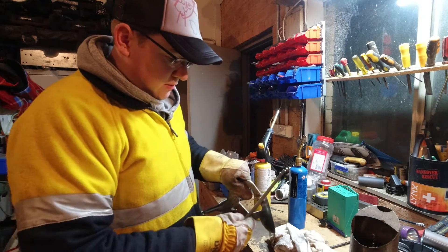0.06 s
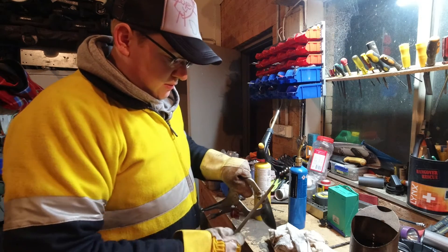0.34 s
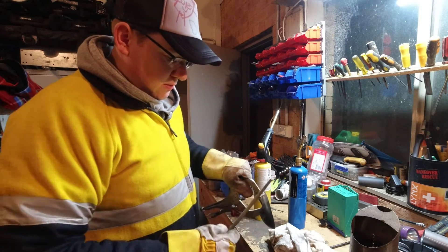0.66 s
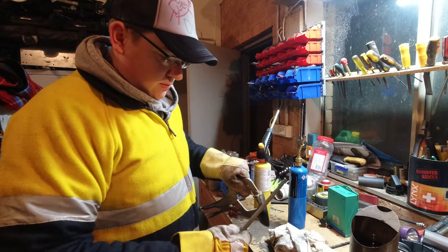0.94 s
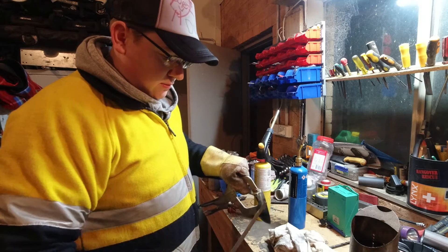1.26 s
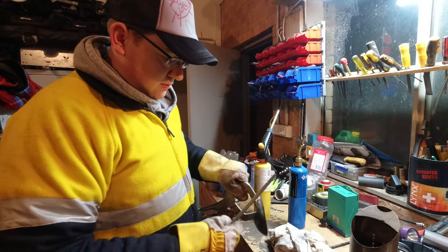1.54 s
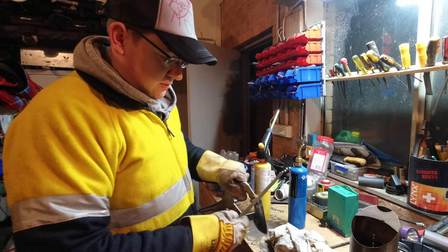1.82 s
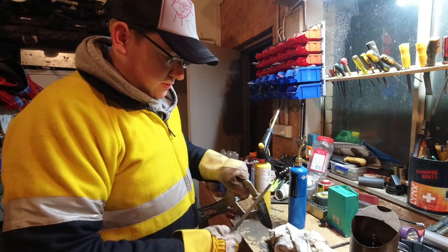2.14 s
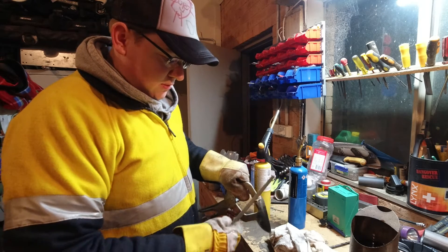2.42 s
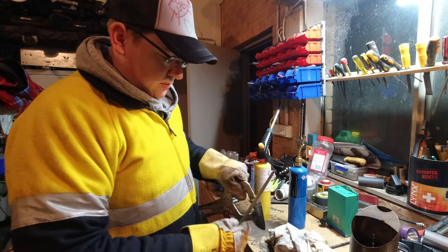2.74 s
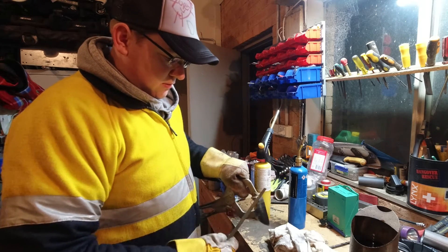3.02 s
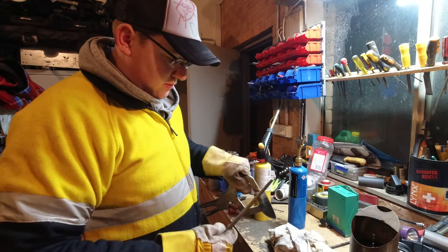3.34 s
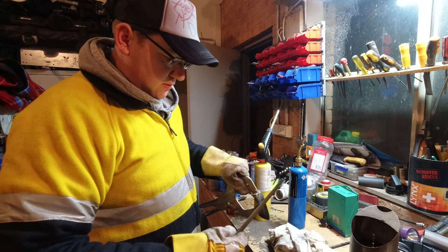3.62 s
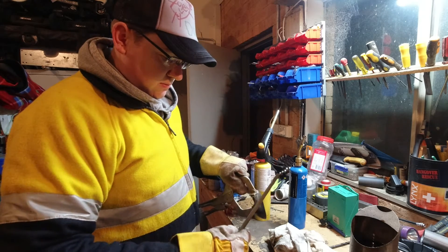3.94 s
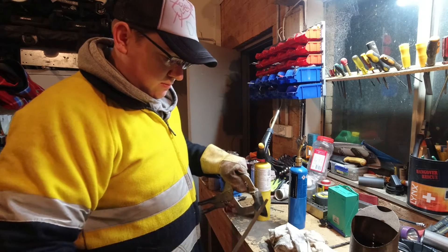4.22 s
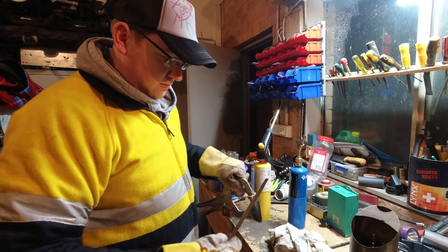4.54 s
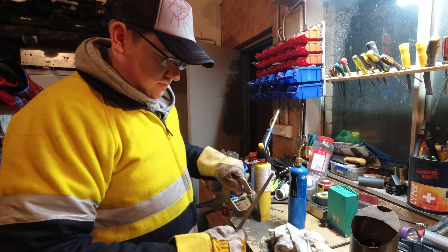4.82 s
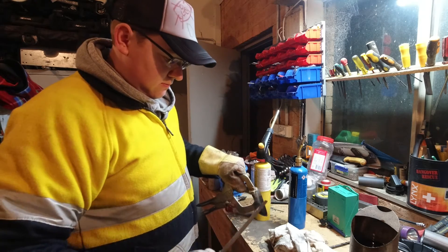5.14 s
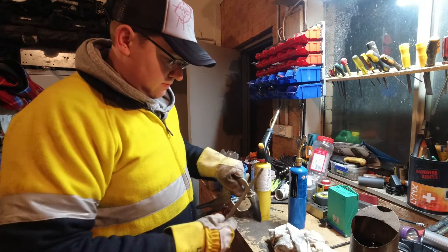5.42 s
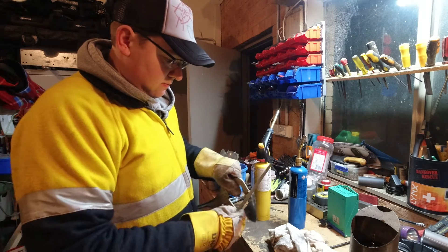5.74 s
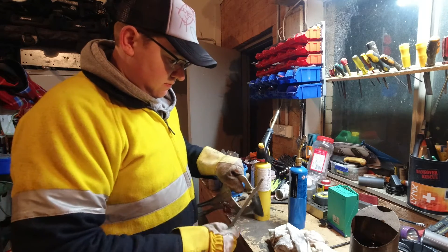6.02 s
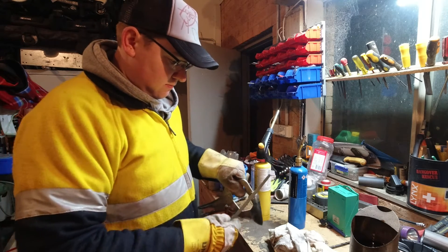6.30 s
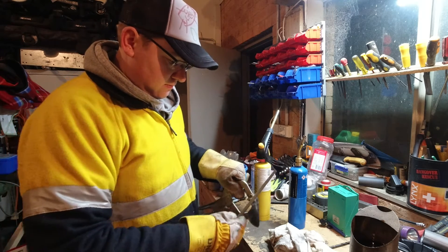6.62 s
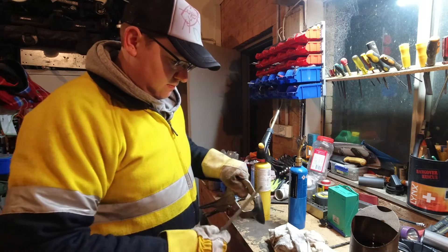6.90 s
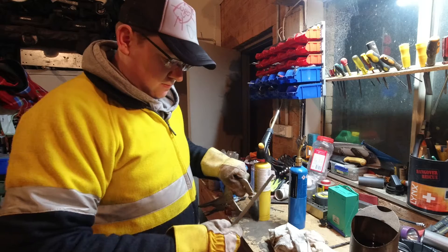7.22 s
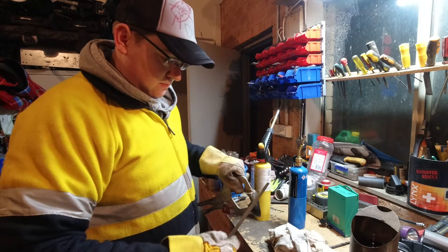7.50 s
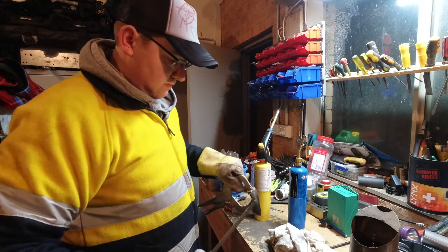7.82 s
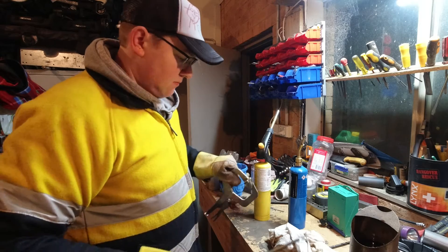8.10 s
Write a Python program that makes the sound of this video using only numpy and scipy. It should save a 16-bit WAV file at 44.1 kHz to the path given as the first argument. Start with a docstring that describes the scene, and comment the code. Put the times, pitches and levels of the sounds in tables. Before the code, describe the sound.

A hand file works a clamped steel knife blade, close and centred in a small garage. There are nine short strokes, each lasting about a third of a second, at roughly 0.3, 1.1, 2.0, 2.8, 4.1, 4.9, 5.9, 6.7 and 7.5 seconds. Most begin with a light metallic clack as the file is set down, the sharpest at 2.7 seconds, just before the strongest stroke. Each push swells quickly into a gritty, uneven rasp with ringing steel, a hissy top and a little bench rattle, then lifts away. The tone shifts between strokes, and several carry brief high squeals, clearest around 3.0, 4.2 and 6.1 seconds. Very faint, thin steel tones linger in the pauses. Close walls add a short stereo echo. A soft room rumble runs throughout, and a faint low hum swells from about 3.7 seconds and fades by 7.3.

```python
"""Filing a knife in a small garage

At the bench, in stereo: a hand file is pushed nine times along a clamped steel blade, on one face or
the other. It clacks down, its teeth chip irregularly at the edge and ring blade, file and bench, then
it lifts off. Close walls answer. Thin steel tones linger between strokes, and a faint low hum swells
and fades over the room tone."""
import sys
import numpy as np
from scipy import signal
from scipy.fft import rfft, irfft, next_fast_len
from scipy.io import wavfile
from scipy.ndimage import uniform_filter1d, map_coordinates

SR = 44100
rng = np.random.default_rng(int(sys.argv[2]) if len(sys.argv) > 2 else 0)


def transcribe(u):
    """Save the signal u as a 16-bit wav file named by the first command-line argument.

    u: samples, shape (n,) or (channels, n), limited to [-1, 1]; the rate is SR.
    q: integer samples, one column per channel.
    """
    v = np.clip(np.atleast_2d(u).T, -1, 1)
    q = np.round(v * 32767).astype(np.int16)
    wavfile.write(sys.argv[1], SR, q)


N = 359856

# Pushes of the file. Each row: start, rise and hold in seconds, full bite in dB, sag over the hold
# in dB, then bench rattle and hiss in dB relative to the bite.
PUSHES = [(0.285, 0.12, 0.15, -32, 5.5, -5.5, -2.5), (1.125, 0.085, 0.18, -33, 1, -7.5, -1),
          (2.03, 0.15, 0.22, -34.5, 6, -6, -2.5), (2.8, .14, 0.15, -28.5, 7, -8, -2.5),
          (4.05, .13, 0.2, -33.5, 0.5, -9, -4.5), (4.945, 0.088, 0.17, -31.5, -0.5, -11, -4),
          (5.93, 0.12, 0.17, -30, 6.5, -8.5, -3.5), (6.688, 0.078, 0.15, -31.5, -0.5, -7.5, -4),
          (7.46, 0.23, 0.11, -31, 2, -11, -5.5)]
# The face of the blade, 0 or 1, that each push works.
FACES = [0, 1, 0, 0, 1, 1, 0, 0, 1]
# Resonances of blade, file and bench. Each row: pitch and width in Hz, height in dB on face 0 and on
# face 1, change in dB from the middle of a push to its end.
MODES = [(306.7, 14, 17.5, 15.5, 12.5), (371.8, 34, 21, 30, 3.5), (446.3, 11, 9.5, 28, -3.5),
         (613.3, 18, 14, -24.5, 2.5), (811, 39, 14.5, 23, 1.5), (881, 42, -5, 25.5, 0.5),
         (1052, 45, -5.5, 19.5, -2), (1125, 50, 21, 7.5, 5.5), (1428, 20, 21, 18.5, 3.5),
         (1540, 66, 9.5, 3.5, 6), (1695, 46, 15, 4, 6), (1976, 29, 20, 25, -1), (2162, 32, -14.5, 2, -10),
         (2878, 40, 14, -5, -4), (2944, 28, 2, 21.5, -3), (3123, 67, 19.5, 20, 0.5),
         (3377, 100, 13, -8, -6.5), (3606, 58, 8, 14.5, -1), (3720, 26, 15.5, 18.5, 2.5),
         (4110, 39, 9, 17, -0.5), (4793, 77, 12.5, 19.5, 5.5), (5230, 94, 14, 7, 5),
         (5906, 60, 15.5, 22.5, 2.5), (6710, 130, 9, 18, 2), (7355, 34, 26.5, 25, 4),
         (8730, 82, 11.5, 14.5, 0.5), (10560, 420, 17.5, 21, 8.5), (12700, 170, 8, 9.5, 10)]
TOUCH_DB, EASE_S = 20.5, 0.043  # first touch under full bite; time the hand takes to ease off


def amp(db):
    """Decibels to gain."""
    return 10 ** (np.asarray(db) / 20)


def unit(x):
    """Scale to rms 1."""
    return x / np.sqrt(np.mean(x ** 2) + 1e-20)


def along(points, hz):
    """(Hz, value) points joined on a log frequency axis."""
    freqs, values = np.transpose(points)
    return np.interp(np.log(hz + 1), np.log(freqs + 1), values)


def wobble(rate, n):
    """A smooth random curve, rate knots a second."""
    return map_coordinates(rng.standard_normal(int(n * rate / SR) + 4), [np.arange(n) * rate / SR])


def filtered(x, response):
    """x shaped by a gain over frequency."""
    n = x.shape[-1]
    size = next_fast_len(n + 4096)
    return irfft(rfft(x, size) * response(np.fft.rfftfreq(size, 1 / SR)), size)[..., :n]


def add(track, start, sound):
    """Mix a sound into the track at start seconds."""
    part = track[round(start * SR):][:len(sound)]
    part += sound[:len(part)]


def spread(pair):
    """Two unrelated signals become left and right: most alike in the low mids, apart in the treble."""
    # Stereo width of the room. Each row: frequency in Hz, side gain in dB.
    width = [(100, -2.5), (380, -17.5), (700, -9.5), (1300, -9.5), (2400, -7.5), (4400, 4.5), (8000, -3),
             (15000, 4.5)]
    mid, side = pair[0], filtered(pair[1], lambda hz: amp(along(width, hz)))
    return np.array([mid + side, mid - side])


def room_tone(level_db=-66, side_db=-7):
    """Soft rumble of the still garage."""
    # Colour of the rumble. Each row: frequency in Hz, relative density in dB.
    colour = [(12, -21), (25, 1), (40, 4.5), (70, -1), (134, -6.5), (250, -16), (600, -21.5), (1200, -25),
              (3000, -32), (4500, -36), (12000, -67.5), (16000, -97.5)]
    noise = filtered(rng.standard_normal((2, N)), lambda hz: amp(along(colour, hz)))
    return amp(level_db) * unit(spread(noise * amp([[0], [side_db]])))


def hum(level_db=3.5, drone_db=3, waver_rad=0.25, sway_db=1):
    """A low hum swells and fades, drifting in pitch, while fainter drones come and go."""
    # Course of the hum. Each row: time in seconds, pitch in Hz, level in dB.
    course = [(3.5, 78.3, -75.5), (3.74, 76.0, -58.5), (4.53, 76.1, -51.5), (5.49, 78, -54.5),
              (5.54, 79.9, -57.5), (5.83, 79.8, -47), (6.51, 81.1, -58.5), (6.65, 83.2, -70.5),
              (7.06, 81.4, -55), (7.2, 78, -67), (7.4, 81, -77)]
    # The drones. Each row: middle and half length in seconds, pitch in Hz, level in dB.
    drones = [(1.3, 2.2, 88, -68.5), (0.9, 1.7, 178, -76.5), (3.7, 0.62, 118, -66), (7.92, 0.53, 85, -68.5)]
    t = np.arange(N) / SR
    times, pitches, levels = np.transpose(course)
    phase = 2 * np.pi * np.cumsum(np.interp(t, times, pitches)) / SR + waver_rad * wobble(12, N)
    swell_db = np.interp(t, times, levels, left=-150, right=-150)
    track = amp(swell_db + level_db + sway_db * wobble(9, N)) * np.sin(phase)
    for middle, half, hz, db in drones:
        swell = amp(db + drone_db) * np.exp(-((t - middle) / half) ** 2)
        track += swell * np.sin(2 * np.pi * hz * t + 0.77 * wobble(18, N))
    return track


def lingering_steel(t60=3.4, vary_db=1.2, sway_db=-0.5, waver_rad=0.4, damp_db_per_s=300):
    """With the file off it, the steel sings on faintly until the next push damps it."""
    # Barely damped modes. Each row: pitch in Hz, level in dB.
    free_modes = [(1180, -86), (1803, -90), (1884, -85), (2368, -80.5), (2948, -78.5), (3032, -82.5)]
    # One added tone a pause, the first before any push. Each row: pitch in Hz, level in dB.
    pause_tones = [(1180, -72.5), (1210, -70), (1803, -76), (2368, -82), (2368, -84.5), (2948, -73),
                   (3032, -72), (2920, -72.5), (3032, -66), (1820, -75)]
    track = np.zeros(N)
    lifts = [0] + [start + rise + hold for start, rise, hold, *_ in PUSHES]
    stops = [row[0] for row in PUSHES] + [N / SR]
    for lift, stop, pause_tone in zip(lifts, stops, pause_tones):
        t = np.arange(0, stop - lift + 0.1, 1 / SR)
        damped_db = damp_db_per_s * np.maximum(lift + t - stop, 0)
        envelope = amp(-60 * t / t60 - damped_db) * (1 - np.exp(-t / 0.0078))
        for hz, db in [*free_modes, pause_tone]:
            # the tone wavers as the hands move
            sway = amp(vary_db * rng.standard_normal() + sway_db * wobble(11, len(t)))
            tone = np.sin(2 * np.pi * hz * t + waver_rad * wobble(25, len(t)))
            add(track, lift, amp(db) * envelope * sway * np.sqrt(2) * tone)
    return track


def chips(n, per_second, spread_db):
    """Teeth break off chips at random moments and in unequal sizes."""
    breaks = rng.random(n) < per_second / SR
    signs = rng.choice([-1, 1], n)
    sizes = amp(spread_db * np.clip(rng.standard_normal(n), -2, 2))
    return unit(breaks * signs * sizes)


def soften(x, edge_hz):
    """A soft contact loses its top end."""
    return filtered(x, lambda hz: 1 / (1 + (hz / edge_hz) ** 16))


def grip(vary_db=1.75, ripple_db=3.5, size=4096):
    """Each grip on the file shifts the strong modes' levels and picks a new crowd of weak, high ones."""
    hz = np.fft.rfftfreq(size, 1 / SR)
    crowd = map_coordinates(rng.standard_normal(size // 8), [np.arange(len(hz)) / 5])
    return vary_db * rng.standard_normal(len(MODES)), ripple_db * crowd * np.clip(hz / 5000, 0, 1)


def blade_ring(face, travel, shift_db, crowd_db, size=4096):
    """The steel's answer to one chip, with the file at travel from about -1 (push begins) to 1 (ends)."""
    # Broad colour of the chipping. Each row: frequency in Hz, level in dB on face 0 and on face 1.
    rasp = [(60, -38.5, -44), (168, -14, -19), (257, -5, -22), (580, -3.5, -19.5), (756, 3, -18),
            (1150, -4, -3.5), (2550, -0.5, -2), (3360, -1.5, -1), (4130, -10, -13), (8860, -17.5, -17),
            (9440, -6.5, -8.5), (11270, -12.5, -15), (15700, -23.5, -18.5)]
    hz = np.fft.rfftfreq(size, 1 / SR)
    mode_hz, width_hz, *face_db, change_db = np.transpose(MODES)
    power = amp(face_db[face] + travel * change_db + shift_db) ** 2
    peaks = 1 / (1 + (2 * (hz[:, None] - mode_hz) / width_hz) ** 2)
    rasp_db = along(np.array(rasp)[:, [0, 1 + face]], hz)
    gain = amp(rasp_db + crowd_db) * np.sqrt(1 + peaks @ power)
    cepstrum = irfft(np.log(gain))
    cepstrum[1:size // 2] *= 2  # minimum phase: the ring follows the chip
    cepstrum[size // 2 + 1:] = 0
    return irfft(np.exp(rfft(cepstrum)))


def excite(force, ring, bench_db, hiss_db):
    """A force rings the work: the bench answers low, the steel in the middle, the chips hiss on top."""
    bench = lambda hz: 1 / (1 + (hz / 1800) ** 12)
    hiss = lambda hz: 1 - 1 / (1 + (hz / 4300) ** 12)
    steel = lambda hz: 1 - bench(hz) - hiss(hz)
    drive = sum(amp(db) * filtered(force, band) / np.linalg.norm(filtered(ring, band))
                for band, db in [(bench, bench_db), (steel, 0), (hiss, hiss_db)])
    return signal.fftconvolve(drive, ring)


def clacks(level_db=-3, lead_in_db=-19, knock_db=6, skid_s=0.0115, hard_db=-32, damp_db=6):
    """Each clack swells in briefly, knocks once and skitters for a few milliseconds."""
    # The file is set down. Each row: time in seconds, level in dB.
    landings = [(0.1799, -38), (1.0842, -52.5), (1.8646, -48), (1.9964, -43.5), (2.0028, -37),
                (2.7052, -29), (2.713, -41.5), (4.0441, -49), (4.851, -42), (5.8339, -35), (6.5933, -36),
                (7.4583, -45)]
    # Colour of a clack on face 0, then face 1. Each row: thud and hiss in dB relative to the steel.
    colours = [(-4, -6), (-2, -16)]
    track, lead = np.zeros(N), SR // 50
    t = np.arange(-lead, SR // 10) / SR
    for at, db in landings:
        face = FACES[np.argmin([abs(row[0] - at) for row in PUSHES])]
        thud_db, hiss_db = colours[face]
        envelope = np.where(t < 0, amp(lead_in_db) * np.exp(t / 0.0078), np.exp(-t / skid_s))
        force = chips(len(t), per_second=4900, spread_db=1.5) * envelope
        force[lead + 20] += amp(knock_db)
        force = soften(force, edge_hz=12000 * 2 ** (min(db - hard_db, 0) / 45))  # lighter is duller
        _, crowd_db = grip()
        ring = blade_ring(face, -1, -damp_db, crowd_db / 2)  # the resting file damps the strong modes
        add(track, at + t[0], amp(db + level_db) * excite(force, ring, thud_db, hiss_db))
    return track


def pressure(t, rise, hold, sag_db, ease_db_per_s=229, lift_db_per_s=600):
    """Bite in dB relative to full, t seconds into a push: the hand leans in, sags, eases off, lifts."""
    lean = TOUCH_DB * np.clip(1 - t / rise, 0, 1) ** 1.23  # fast at first, then more gently
    sag = sag_db * np.clip((t - rise) / hold, 0, 1)
    after = t - rise - hold
    ease = ease_db_per_s * np.clip(after, 0, EASE_S)
    lift = lift_db_per_s * np.maximum(after - EASE_S, 0)
    return -lean - sag - ease - lift


def snags(times, level_db=-14.5, decay_s=0.015):
    """The teeth dig in for a moment: the force jumps and dies away."""
    # The snags. Each row: time in seconds, level in dB.
    digs = [(0.3326, -26), (0.382, -17.5), (0.4485, -14), (0.565, -28.5), (1.1428, -33.5), (1.1955, -20.5),
            (1.283, -19), (2.3424, -40), (2.4066, -26), (2.8406, -16), (2.9515, -15), (4.1664, -27.5),
            (4.997, -29.5), (5.027, -14), (5.199, -16), (6.7635, -27.5), (6.8656, -12.5), (7.569, -23),
            (7.6708, -15.5)]
    return sum(amp(db + level_db) * (times >= at) * np.exp(-np.abs(times - at) / decay_s)
               for at, db in digs)


def push(row, face, level_db=-2.21, catch_s=0.0099, flutter_db=1.16, grit_db=2.5, dull_db=-45):
    """One stroke: a stream of chips, uneven with hand pressure, travels along the blade."""
    start, rise, hold, full_db, sag_db, bench_db, hiss_db = row
    length = rise + hold + EASE_S
    t = np.arange(0, length + 0.069, 1 / SR)
    drop_db = pressure(t, rise, hold, sag_db)
    bite_db = full_db + drop_db
    bench_db -= 0.41 * np.maximum(drop_db, -TOUCH_DB)  # the rattle follows only part of a drop in bite
    hiss_lag_db = 3 * np.maximum(1 - t / rise, 0)  # the hiss catches up over the rise
    hiss_db += 1.8 * wobble(40, len(t)) - hiss_lag_db
    catch = 1 - np.exp(-t / catch_s)
    unevenness = unit(amp(flutter_db * wobble(55, len(t)) + grit_db * wobble(600, len(t))))
    bite = amp(bite_db + level_db) * catch * unevenness
    grit = chips(len(t), per_second=5000, spread_db=5.5)
    sharp = 1 / (1 + amp(dull_db - bite_db) ** 2)  # a light touch lacks the very top
    grit = sharp * grit + (1 - sharp) * soften(grit, edge_hz=12500)
    force = np.hypot(bite, snags(start + t)) * grit
    progress = np.clip(t / length, 0, 1)
    shift_db, crowd_db = grip()
    early = excite(force * (1 - progress), blade_ring(face, -1.1, shift_db, crowd_db), bench_db, hiss_db)
    late = excite(force * progress, blade_ring(face, 0.94, shift_db, crowd_db), bench_db, hiss_db)
    return early + late


def filing():
    """The nine strokes in turn, each on its face of the blade."""
    track = np.zeros(N)
    for row, face in zip(PUSHES, FACES):
        add(track, row[0], push(row, face))
    return track


def chatter(level_db=-2, min_width_hz=42, width_share=0.021):
    """The teeth lock onto one resonance for a moment and it sings out, a restless narrow tone."""
    # The squeals. Each row: middle and half length in seconds, pitch in Hz, level in dB.
    squeals = [(0.4, 0.03, 3110, -35), (0.46, .03, 1965, -39), (1.253, 0.058, 2985, -36),
               (1.265, .055, 15450, -39.5), (1.371, 0.019, 1990, -40.5), (2.959, 0.034, 3130, -30.5),
               (3.0, 0.05, 3300, -37.5), (4.182, .035, 1984, -31.5), (4.176, 0.034, 2940, -33.5),
               (4.32, 0.036, 1985, -36.5), (5.081, 0.026, 3730, -39.5), (5.075, 0.04, 15000, -51),
               (6.062, 0.025, 2000, -35), (6.12, 0.022, 3137, -30.5), (7.645, 0.059, 1985, -33.5),
               (7.691, .034, 2820, -46), (7.797, 0.043, 3226, -42), (7.795, 0.032, 5925, -40.5)]
    track = np.zeros(N)
    t = np.arange(SR // 2) / SR - 0.25
    for middle, half, hz, db in squeals:
        width_hz = max(min_width_hz, width_share * hz)
        phase = 2 * np.pi * hz * t + wobble(2 * width_hz, len(t))
        flicker = unit(amp(5.8 * wobble(2 * width_hz, len(t))))
        swell = np.exp(-(t / half) ** 2 / 2)
        add(track, middle + t[0], amp(db + level_db) * swell * flicker * unit(np.sin(phase)))
    return track


def echoes(early_db=4, early_s=0.014, even_hz=110):
    """Bench and close walls answer at once, the rest of the room dies away behind them."""
    # Decay of the garage. Each row: frequency in Hz, seconds to fall 60 dB.
    decay_times = [(200, 0.44), (530, 0.55), (1400, 0.36), (3700, 0.41), (7000, 0.39), (10500, 0.24),
                   (15000, 0.3)]
    hz, frame_s, frames = signal.stft(rng.standard_normal((2, SR // 2)), SR, nperseg=256)
    decay = amp(-60 * frame_s / along(decay_times, hz)[:, None])
    _, tail = signal.istft(frames * decay, SR, nperseg=256)
    t = np.arange(tail.shape[1]) / SR
    early_boost = 1 + amp(early_db) * np.exp(-t / early_s)
    spectrum = rfft(tail * (t > 0.0015) * early_boost)
    # even out the echo's spectrum so that no pitch stands out
    power = uniform_filter1d(np.abs(spectrum) ** 2, max(3, round(even_hz * t[-1])))
    tail = irfft(spectrum / np.sqrt(np.abs(power) + 1e-12)) * (t < 0.4)
    return spread(tail / np.linalg.norm(tail[0]))


def garage(x, direct_db=-2.5, echo_db=-3.5):
    """The direct sound sits in the centre; the arms move, so the echoes around it keep changing."""
    wet, hop = np.zeros((2, N)), SR // 3
    for start in range(0, N, hop):
        for channel, answer in zip(wet, echoes()):
            add(channel, start / SR, signal.fftconvolve(x[start:start + hop], answer))
    return amp(direct_db) * x + amp(echo_db) * wet


def scene():
    """The work at the bench and the room around it, as they reach the microphone."""
    return garage(filing() + clacks() + chatter()) + lingering_steel() + hum() + room_tone()


def record(dry, top_hz=15830):
    """The microphone and recorder keep nothing above their band limit."""
    return filtered(dry, lambda hz: np.clip((top_hz - hz) / 200 + 0.5, 0, 1))


dry = scene()
out = record(dry)
transcribe(out)
```